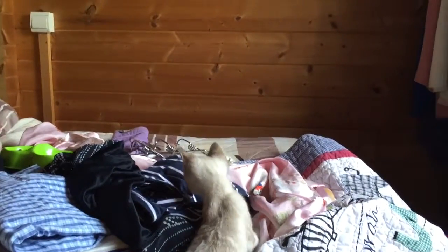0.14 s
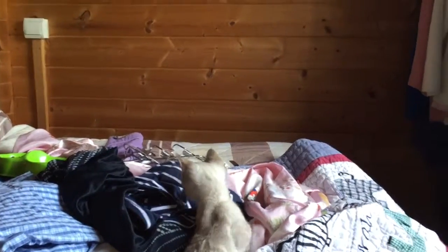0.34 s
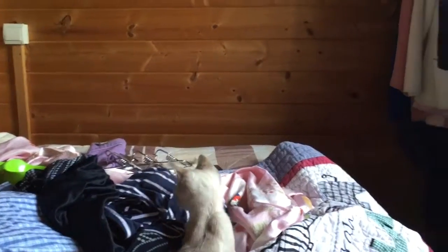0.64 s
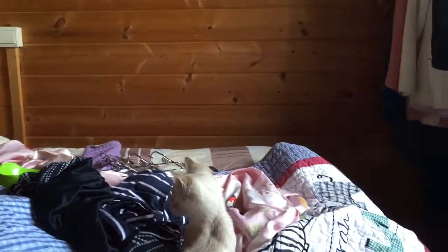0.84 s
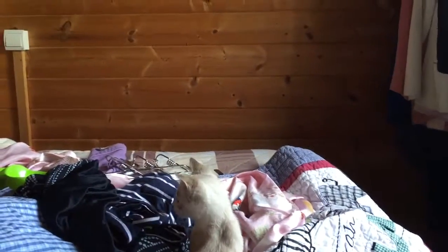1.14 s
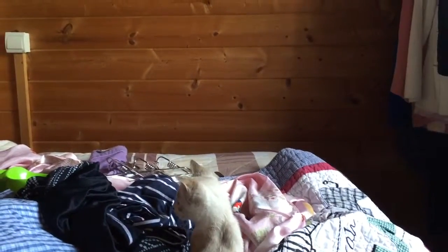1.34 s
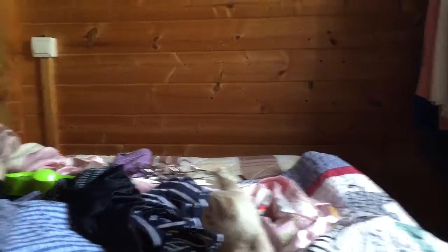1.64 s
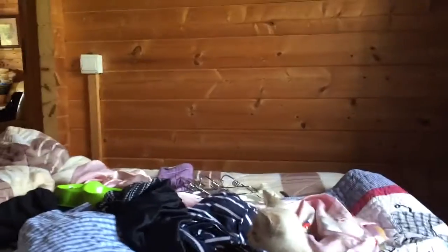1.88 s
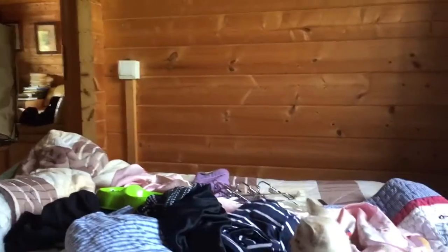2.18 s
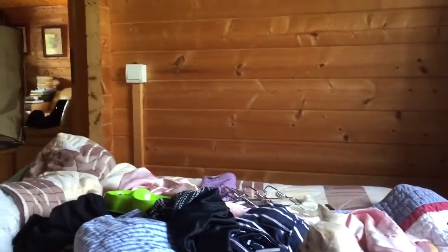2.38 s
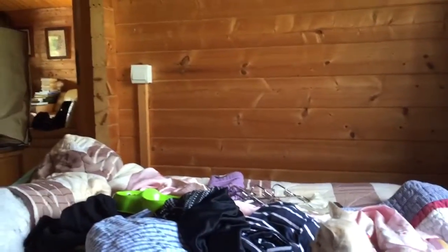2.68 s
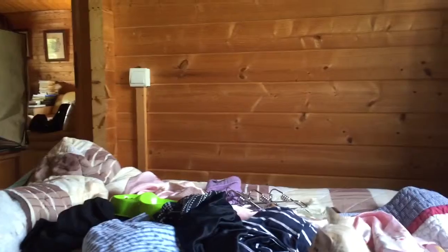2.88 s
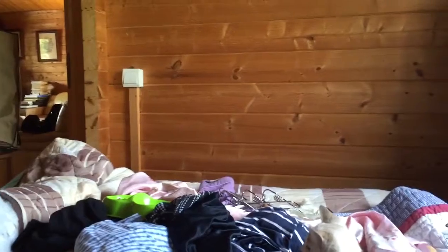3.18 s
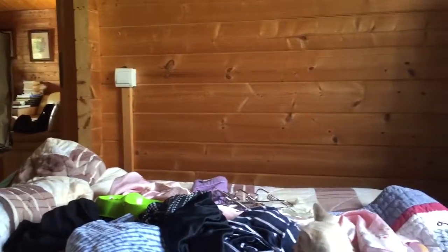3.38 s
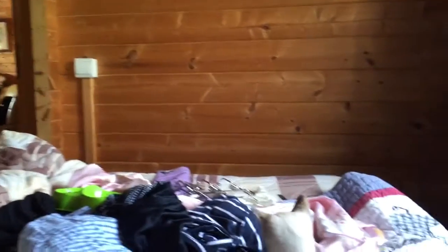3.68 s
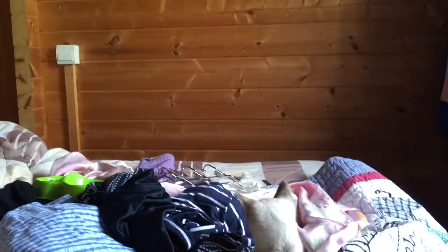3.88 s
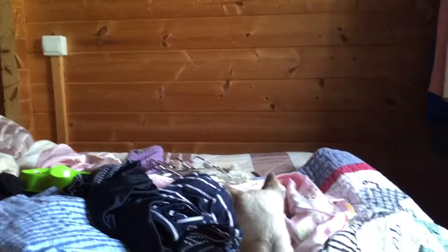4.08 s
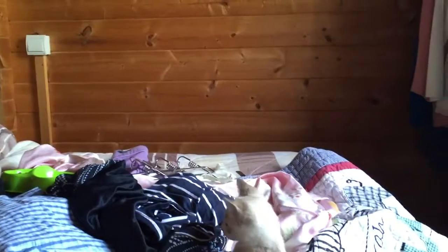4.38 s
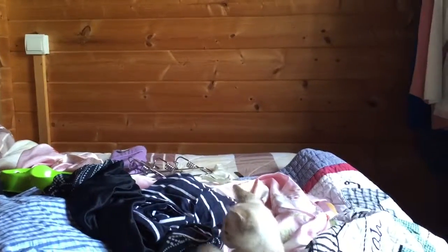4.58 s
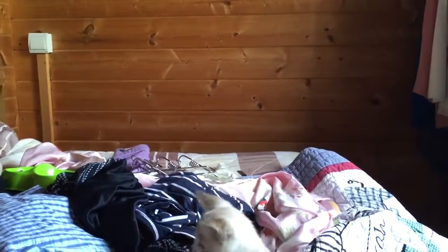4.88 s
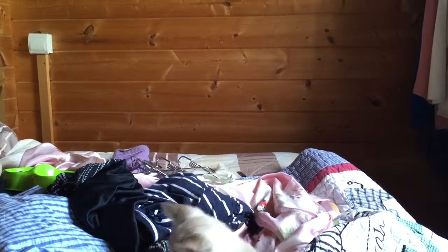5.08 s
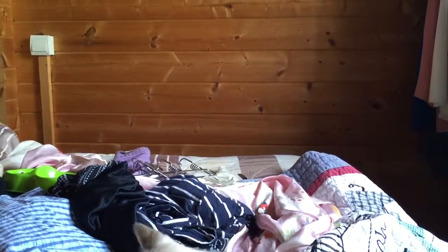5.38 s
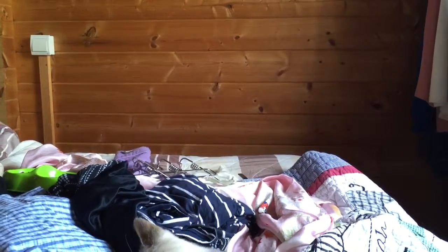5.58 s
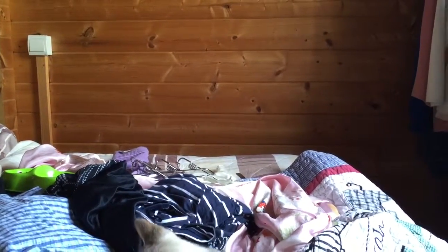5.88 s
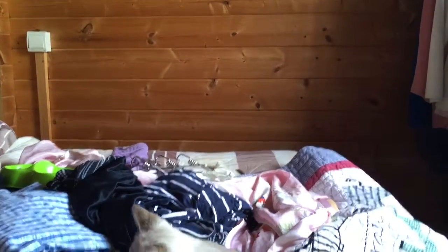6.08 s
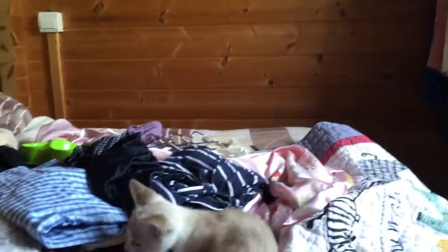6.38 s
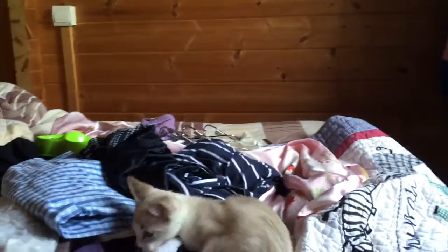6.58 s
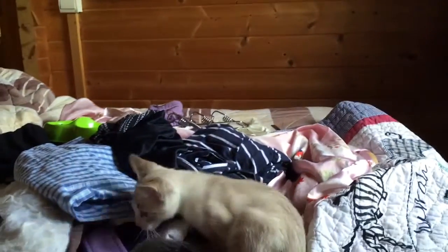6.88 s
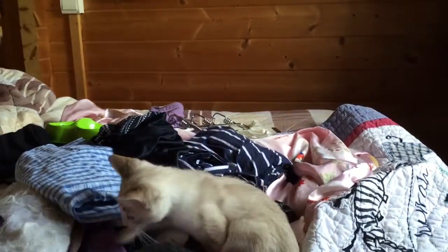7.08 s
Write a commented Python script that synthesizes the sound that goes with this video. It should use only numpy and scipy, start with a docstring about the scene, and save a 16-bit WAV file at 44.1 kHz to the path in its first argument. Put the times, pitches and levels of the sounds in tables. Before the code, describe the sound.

Thin high nose whistles and falling yelps from a restless dog, puffs of air, soft paw thuds, then two loud hoarse barks in a small room.

```python
"""In a small wooden room a dog whistles thinly through its nose, sniffs, chuffs, yelps, barks twice and thumps its paws.
Air jets give the whistles (gliding tones with an octave and hiss), and shaped noise the sniffs and chuffs. The voice is
a sum of partials: yelps fall and settle into whines, barks break from a squeal to a rough, lower pitch. Paws ring the
boards as damped low tones and noise. Close walls answer, a faint longer echo lingers, and steady low-level noise remains."""
import sys
import numpy as np
from scipy import signal
from scipy.fft import rfft, irfft, next_fast_len
from scipy.io import wavfile
from scipy.ndimage import uniform_filter1d, minimum_filter1d, map_coordinates

SR = 44100
rng = np.random.default_rng(int(sys.argv[2]) if len(sys.argv) > 2 else 0)


def store_pcm(level_fs):
    """Save levels as 16-bit WAV."""
    pcm = np.round(np.clip(level_fs, -1, 1) * 32767).astype(np.int16)
    wavfile.write(sys.argv[1], SR, np.atleast_2d(pcm).T)


N = 319119
TOP_HZ = 15500  # upper limit of the whole sound

# Spectrum of the quiet room: hz, relative_db
STILL_COLOUR = [(15, -55), (25, -24.5), (55, 6.5), (101, -1.5), (193, -7), (482, -12), (782, -16),
                (1300, -17), (4750, -19.5), (6380, -23.5), (9550, -26), (13200, -31), (15500, -29)]
STILL_DB = -70  # rms
# Decay of the wooden walls' answer: hz, t60_s
WALL_DECAY = [(110, .25), (200, 0.19), (400, 0.39), (700, 0.2), (2000, 0.21), (5000, 0.17), (12000, 0.18)]
# Spectrum of the late echo: hz, relative_db
LINGER_COLOUR = [(300, -30), (700, -15), (1000, 0), (1300, -3), (1600, -2.5), (2000, 4), (2400, 4),
                 (2800, -9.5), (4000, -4.5), (7000, -20)]

# Nose whistles: start_s, length_s, start_hz, turn_hz, end_hz, turn_share_of_length, mid_level_db,
# swell_start_to_end_db, octave_re_tone_db, air_re_tone_db (before the common air trim)
WHISTLES = [ (0.641, .165, 6110, 5970, 5905, .17, -49, 5, -11, -21),
            (0.850, 0.24, 5830, 5833, 5770, .55, -49.5, 0, -15, -22.5),
            (1.496, 0.23, 5900, 5830, 5520, 0.5, -44, -9.5, -21.5, -17),
            (1.723, 0.2, 5664, 5635, 5480, 0.45, -47.5, 6.5, -7, -15),
            (1.908, 0.11, 5610, 5484, 5420, .4, -42, -1.5, -14, -22.5),
            (2.222, 0.21, 5950, 5480, 5595, .36, -45, -17, -3, -9),
            (2.440, .158, 5634, 5560, 5500, .5, -82.5, -8, -9, 1),
            (2.602, 0.099, 5400, 5590, 5580, 0.53, -67.5, 6, -5, -9),
            (2.695, 0.073, 5460, 5476, 5120, 0.67, -58, -8, -9, -3),
            (3.020, 0.091, 5540, 5960, 5730, .45, -55, -10, -5.5, 1.5),
            (3.188, 0.085, 5840, 5574, 5370, .55, -58.5, 4, -12, -3),
            (3.478, 0.071, 5950, 6000, 5830, 0.63, -59, 11, -22, -4.5),
            (3.632, .240, 5640, 5657, 5920, 0.67, -56, -6.5, -10.5, -8),
            (4.195, 0.068, 6030, 5760, 5800, .55, -53.5, 9, -10.5, -2.5),
            (4.269, .110, 5690, 5605, 5665, .55, -70.5, -6, -17, -10.5),
            (4.385, 0.26, 5710, 5726, 5640, 0.54, -66.5, 16, -12, -2),
            (5.165, 0.044, 5600, 5510, 5400, .4, -64.5, -6, -29, -39),
            (5.321, 0.19, 5310, 5495, 5290, .75, -56, 15.5, -2.5, -11.5),
            (6.277, .154, 5580, 5860, 5556, 0.373, -48.5, -8, -11, -12),
            (6.43, 0.13, 5370, 5417, 5620, 0.56, -45, 13.5, -13.5, -23),
            (6.568, 0.11, 5400, 5415, 5543, .5, -47, -6.5, -15.5, -8.5),
            (6.863, .142, 5870, 5460, 5463, 0.31, -48, -10, -0.5, -11.5),
            (7.005, 0.13, 5950, 5930, 5400, 0.36, -52, -5.5, -22, -9.5)]
# Resonances of the nose that colour the whistle's hiss: hz, relative_db
NOSE_AIR_COLOUR = [(700, -17), (1450, -0.5), (1900, -12.5), (2500, 0), (3200, -11), (4100, 1.5),
                   (5000, -2.5), (7000, -7), (9000, -7), (10300, -12.5), (12000, -32.5), (15000, -19.5)]
WHISTLE_ATTACK_S, WHISTLE_RELEASE_S = 0.016, 0.025
WHISTLE_FLICKER_DB, WHISTLE_FLICKER_RATE = 0.94, 26  # unsteady jet: depth, random knots a second

# Thin puffs through the nostrils: centre_s, peak_level_db
SNIFFS = [(1.116, -73.5), (2.039, -64.5), (3.95, -66.5), (4.038, -73), (5.302, -62.5), (5.635, -58),
          (6.001, -68), (7.026, -58)]
# Spectrum of a sniff: hz, relative_db
SNIFF_COLOUR = [(1000, -10.5), (3000, -9.0), (7800, -23.5), (9000, -2), (10000, -21.5), (15000, -33.5)]

# Chuffs of air: time_s, level_db, hiss_db (relative), rise_constant_s, decay_constant_s
CHUFFS = [(1.295, -39.5, -32, 0.0083, 0.032), (1.465, -51, 4.5, 0.022, 0.042),
          (2.057, -54.5, 3.5, .03, 0.052), (2.175, -42, 1, 0.05, 0.058), (2.817, -62, 5, 0.034, 0.14),
          (2.919, -43, -6.5, 0.0047, 0.068), (3.15, -28, -23.5, 0.0035, 0.036),
          (3.269, -17.5, -16, 0.015, 0.034), (3.442, -27, -19, 0.01, 0.041),
          (5.521, -18, -18, 0.00924, .029), (6.242, -30.5, -16, 0.007, 0.033),
          (6.586, -23, -21, 0.0051, 0.033), (6.83, -44, 1, 0.029, 0.044), (6.938, -24.5, -23, 0.011, 0.033)]
# Spectrum of a chuff's body: hz, relative_db
CHUFF_COLOUR = [(71, -43), (120, -13), (215, -13.5), (373, -12.5), (835, -11), (1520, -4), (1810, -2.5),
                (2050, 0), (2360, -6.5), (4240, -16.5), (4960, -24.5), (5200, -26.5), (6760, -45),
                (11400, -120)]
# Spectrum of a chuff's hiss: hz, relative_db
HISS_COLOUR = [(2060, -29), (3500, -1), (3960, -13.5), (4550, -5.5), (4990, -22), (5510, -7), (6770, -17),
               (9240, -13.5), (15500, -24.5)]

# Paws on the boards: start_s, level_db, board_hz, scuff_db (relative)
PAWS = [(1.32, -53, 138, -12), (1.781, -39, 113, -13), (1.819, -40, 126, -28), (1.843, -55, 75.5, -33),
        (2.933, -33.5, 154, -15), (2.949, -39, 75.5, -38), (3.027, -37, 178, -13), (3.13, -34, 76.7, -9),
        (3.168, -30.5, 158, -20), (3.302, -42.5, 131, -22), (3.458, -33, 196.3, -24),
        (3.589, -48.5, 74, -17.5), (3.968, -40.5, 247, -10), (3.991, -44, 142.3, -11.5),
        (5.549, -33.5, 190, -24), (6.27, -42.5, 192.3, -7.5), (6.609, -37, 186, -20), (6.719, -42, 75, -20),
        (6.798, -66, 85.5, -27), (7.083, -53, 90.7, -2)]
# Spectrum of the boards' dull noise: hz, relative_db
BOARD_COLOUR = [(20, -28.5), (45, -10.5), (72, 3.5), (100, 0.5), (135, -1), (200, 4.5), (300, -14.5),
                (500, -10.5), (1000, -31), (3000, -39.5)]
# Spectrum of a pad's scuff: hz, relative_db
SCUFF_COLOUR = [(100, -14.5), (450, -2.0), (900, -2.5), (3000, -9.5), (8000, -36)]

# First yelp, falling into a whine: time_s, pitch_hz, level_db, octave_level_db
YELP_A = [(2.2, 1443, -59.5, -72), (2.224, 1429, -28, -41), (2.24, 1375, -33, -75),
          (2.27, 1285, -35.5, -62), (2.284, 1245, -39.5, -93), (2.308, 1121, -50, -77.5),
          (2.33, 960, -35.5, -53.5), (2.404, 856.5, -26.5, -66), (2.45, 694, -37, -44),
          (2.554, 650.6, -48, -37), (2.602, 678, -34.5, -41), (2.652, 641.4, -54.5, -38),
          (2.706, 671.7, -37.5, -41.5), (2.77, 652, -82, -66.5)]
# Second yelp: time_s, pitch_hz, level_db, octave_level_db
YELP_B = [(3.005, 1220, -48.5, -63.5), (3.019, 1130, -21.5, -27), (3.051, 1088, -28, -42),
          (3.065, 1040, -29.5, -38), (3.089, 785, -43, -50.5), (3.147, 684.4, -32, -49.5),
          (3.185, 630, -57, -25)]
# Third yelp: time_s, pitch_hz, level_db, octave_level_db
YELP_C = [(4.07, 946, -55, -74), (4.09, 1022, -49, -61), (4.118, 942, -37.5, -48), (4.166, 670, -39.5, -46),
          (4.21, 643, -79, -62), (4.288, 586, -50.5, -72), (4.356, 637.5, -53, -45.5),
          (4.422, 675.7, -37.5, -58.5), (4.444, 645, -52.5, -77), (4.476, 650, -41, -48.5),
          (4.57, 668, -47.5, -67), (4.63, 649, -76.5, -80)]
# Last whine: time_s, pitch_hz, level_db, octave_level_db
YELP_D = [(5.18, 673.2, -62, -63), (5.206, 673.5, -34.5, -52.5), (5.228, 675.0, -35, -54),
          (5.25, 649.0, -45, -45), (5.268, 667.8, -63, -51), (5.286, 629.4, -47.5, -58.5),
          (5.328, 679.9, -37.5, -50), (5.355, 682.8, -59.5, -61)]
# Manner of each yelp: curve, high_pitch_roughness_0_to_1, overtones_db, overtone_tilt_db_per_octave, sidebands_db
# (overtones and sidebands at the reference strengths of voice and whistle)
YELPS = [(YELP_A, 0.19, -53, -1.4, -56), (YELP_B, 0.43, -56, 0, -66), (YELP_C, .8, -56.5, -1, -56),
         (YELP_D, 0.13, -48.5, -34.5, -57.5)]
# Resonances of the muzzle in the yelps' overtones: hz, relative_db
MUZZLE = [(1900, 4), (2600, 7), (3200, -2), (4200, -10), (5100, -43), (7000, -8), (9500, -26.5),
          (15000, -38.5)]
# Spectrum of the sidebands that the voice puts on the whistle: hz, relative_db
SIDEBAND_COLOUR = [(2500, -41), (3100, 4), (3750, 12), (4400, 12.5), (5000, -7), (6500, -1), (7700, -36.5),
                   (9300, 4), (10500, -22.5), (12200, -7), (15000, -24)]
# Low catch in the throat: time_s, pitch_hz, level_db
GRUNT = [(4.17, 410, -79), (4.2, 337, -57.5), (4.22, 370, -46), (4.26, 334, -101)]
YELP_REFERENCE_DB, WHISTLE_REFERENCE_DB = -35.5, -70
# growth of the sidebands, dB for each dB of voice and of whistle
SIDEBANDS_PER_VOICE, SIDEBANDS_PER_WHISTLE = 0.5, 0.4

# Barks: start_s, length_s, attack_s, peak_after_s, peak_db, swell_db_per_s, fade_db_per_s, squeal_re_level_db,
# jaw_opens_after_s, squeal_hz, hoarse_hz, sag_hz_per_s, pitch_breaks_after_s, break_width_s,
# open_jaw_roughness_0_to_1, jitter_share_at_full_roughness, half_pitch_lines_db (before roughness)
BARKS = [(4.937, 0.15, 0.0044, 0.071, -7, 20.5, 261, -15, 0.013, 1036, 765.8, 1100, .044, .009, .45, 0.067, -2),
         (5.705, .140, 0.0044, 0.058, -8.5, 11, 215, -14, .021, 1124, 817.6, 444.2, .022, 0.0028, 0.38, 0.036, 0.5)]
# Spectrum of the first bark, its harmonics included: hz, relative_db
BARK_A_COLOUR = [(100, -50), (400, -32), (560, -16), (740, -6), (1000, -4.5), (1200, -8.5), (1470, 2),
                 (1750, -4.5), (2200, -4), (2600, -15.5), (3000, -12), (3350, -22.5), (3750, -14),
                 (4200, -33.5), (9000, -29), (15000, -53)]
# Spectrum of the second bark, its harmonics included: hz, relative_db
BARK_B_COLOUR = [(100, -43.5), (550, -30), (800, -11.5), (1100, 0.5), (1350, -20.5), (1600, 0.5),
                 (2000, -9.5), (2400, -3.5), (2800, -14), (3130, -9.5), (3550, -11.5), (3950, -14),
                 (4300, -29), (4750, -23.5), (5500, -31.5), (9000, -28.5), (15000, -50.5)]
BARK_RELEASE_S, JAW_WIDTH_S = 0.061, 0.003
JAW_SHUT_DB, JAW_OPEN_DB, BROKEN_DB = -14.5, -7, 6.5  # overtones: shut, open, added once the pitch has broken
SQUEAL_ROUGH, BREAK_ROUGH = 0.14, 0.3  # roughness of the squeal; extra in the middle of the break
FLUTTER_RATE, RATTLE_RATE = 260, 140  # random knots a second
BARK_PATCHY_DB, RATTLE_DEPTH = 1.5, 0.35
# Spectrum of the push under a bark: hz, relative_db
PUSH_COLOUR = [(15, -5.5), (35, -0.5), (90, -7), (170, -3.5), (320, -11.5), (600, -27), (2000, -70)]


def amp(db):
    """Decibels to amplitude ratio."""
    return 10 ** (np.asarray(db) / 20)


def unit(x):
    """Normalization to rms 1."""
    return x / np.sqrt(np.mean(x ** 2) + 1e-20)


def along(points, hz):
    """Interpolation of (hz, value) points on a logarithmic frequency axis."""
    f, v = np.transpose(points)
    return np.interp(np.log(hz + 1), np.log(f + 1), v)


def curves(rows):
    """Linear interpolation in time: the start time, then one value per sample for each column."""
    s, *cols = np.transpose(rows)
    t = np.arange(s[0], s[-1], 1 / SR)
    return [s[0]] + [np.interp(t, s, c) for c in cols]


def wobble(n, rate):
    """Band-limited random modulation: a smooth curve through rate random knots a second."""
    knots = rng.standard_normal(int(n * rate / SR) + 4)
    return map_coordinates(knots, [np.arange(n) * rate / SR])


def noise(n, colour):
    """Spectral shaping: random noise of about rms 1 filtered to a (hz, db) spectrum."""
    m = next_fast_len(n + 8192)
    spectrum = rfft(rng.standard_normal(m))
    shape = amp(along(colour, np.fft.rfftfreq(m, 1 / SR)))
    return unit(irfft(spectrum * shape, m))[:n]


def cycles(hz):
    """Phase as the running integral of frequency, in radians."""
    return 2 * np.pi * np.cumsum(hz) / SR


def gate(t, length, attack, release):
    """Amplitude envelope: smooth rise, hold and smooth fall."""
    rise = np.sin(np.pi / 2 * np.clip(t / attack, 0, 1))
    fall = np.sin(np.pi / 2 * np.clip((length - t) / release, 0, 1))
    return (rise * fall) ** 2


def add(track, s, x):
    """Superposition of a sound on a track at time s, its ends softened over 100 samples."""
    i = np.arange(len(x))
    x = x * np.minimum(1, np.minimum(i, i[::-1]) / 100)
    part = track[max(0, round(s * SR)):][:len(x)]
    part += x[:len(part)]


def partials(colour, hz, phase, patchy_db=3.0):
    """Additive synthesis: gliding partials that swell and fade independently, with about one unit sine's power."""
    weights = amp(along(colour, np.abs(hz))) * (hz < TOP_HZ)
    swells = amp(patchy_db * np.array([wobble(hz.shape[1], 35) for _ in hz]))
    return (weights * unit(swells) * np.sin(phase)).sum(0) / np.linalg.norm(weights, axis=0)


def room(x, wet_db):
    """Reverberation: direct sound plus dense wall reflections decaying by frequency, at constant power."""
    hz, t, z = signal.stft(rng.standard_normal(SR // 2), SR, nperseg=256)
    decay = amp(-60 * t / along(WALL_DECAY, hz)[:, None])
    tail = signal.istft(z * decay, SR, nperseg=256)[1]
    tail = np.pad(tail / np.linalg.norm(tail), (130, 0))  # about 3 ms before the first reflection
    return (x + amp(wet_db) * signal.fftconvolve(x, tail)[:N]) / np.hypot(1, amp(wet_db))


def late_echo(x, late_db, t60):
    """Late reverberation: the house holds a faint, longer, exponentially decaying echo in the middle range."""
    tail = noise(SR, LINGER_COLOUR) * amp(-60 * np.arange(SR) / SR / t60)
    return amp(late_db) * signal.fftconvolve(x, tail / np.linalg.norm(tail))[:N]


def whistle_phase(jitter=0.0048, glide_jitter=0.012):
    """Frequency modulation of the nose tone: notes slide to a turn and an end, less steady while sliding fast."""
    knots = []
    for s, length, start_hz, turn_hz, end_hz, turn, *_ in WHISTLES:
        knots += [(s, start_hz), (s + turn * length, turn_hz), (s + length, end_hz)]
    pitch = np.interp(np.arange(N) / SR, *np.transpose(sorted(knots)))
    slope_hz_per_s = np.abs(np.gradient(pitch)) * SR
    sliding = np.clip(slope_hz_per_s / 9000, 0, 1) ** 2
    deviation = jitter * wobble(N, 130) + glide_jitter * sliding * wobble(N, 700)
    return cycles(pitch * (1 + deviation)), pitch


def whistles(nose_phase, air_trim_db=-3):
    """Jet tone: air through the narrowed nose sings a note and its octave, and hisses; gives sound and strength."""
    out, strength = np.zeros(N), np.zeros(N)
    for s, length, _, _, _, _, db, swell_db, octave_db, air_db in WHISTLES:
        t = np.arange(round(length * SR)) / SR
        phase = nose_phase[round(s * SR):][:len(t)]
        flow = amp(db + swell_db * (t / length - .5))
        flow = flow * gate(t, length, WHISTLE_ATTACK_S, WHISTLE_RELEASE_S)
        first, second = [amp(WHISTLE_FLICKER_DB * wobble(len(t), WHISTLE_FLICKER_RATE)) for _ in range(2)]
        tone = np.sqrt(2) * (first * np.sin(phase) + amp(octave_db) * second * np.sin(2 * phase))
        hiss = amp(air_db + air_trim_db) * noise(len(t), NOSE_AIR_COLOUR)
        add(out, s, flow * (tone + hiss))
        add(strength, s, flow)
    return out, strength


def sniffs(width_s=0.052):
    """Turbulence noise in the nostrils: short bell-shaped swells of air, strongest near 9 kHz."""
    out, t = np.zeros(N), np.arange(SR // 5) / SR - .1
    for s, db in SNIFFS:
        add(out, s + t[0], amp(db) * np.exp(-(t / width_s) ** 2) * noise(len(t), SNIFF_COLOUR))
    return out


def chuffs(body_db=-6, hiss_trim_db=-6):
    """Turbulent pulse: a short blast of air starts abruptly and is quickly spent."""
    out, t = np.zeros(N), np.arange(SR // 4) / SR
    for s, db, hiss_db, rise, decay in CHUFFS:
        blast = (1 - np.exp(-t / rise)) * np.exp(-(t / decay) ** 1.6)
        body = amp(body_db) * noise(len(t), CHUFF_COLOUR)
        hiss = amp(hiss_db + hiss_trim_db) * noise(len(t), HISS_COLOUR)
        add(out, s - .003, amp(db) * blast * (body + hiss))
    return out


def paws(rise_s=0.0047, t60=0.18, thud_db=-6, dull_db=-8, scuff_trim_db=-4):
    """Impact and damped resonance: each pad sets its floorboard ringing low and scuffs over it."""
    out, t = np.zeros(N), np.arange(SR // 3) / SR
    for s, db, hz, scuff_db in PAWS:
        thud = amp(thud_db) * np.sin(cycles(hz * (1 + 0.092 * wobble(len(t), 60))))
        board = thud + amp(dull_db) * noise(len(t), BOARD_COLOUR)
        ringing = amp(-60 * t / t60) * (1 - np.exp(-t / rise_s)) * board
        scuff = amp(scuff_db + scuff_trim_db) * np.exp(-t / 0.026) * noise(len(t), SCUFF_COLOUR)
        add(out, s, amp(db) * (ringing + scuff))
    return out


def yelps(nose_phase, nose_hz, whistling, jitter=0.0058, strain=0.04, breath_db=-14,
          attack=0.0048, release=0.01685):
    """Harmonic voice with intermodulation: shakier while high, overtones rising and falling in step with the voice."""
    out = np.zeros(N)
    for rows, roughness, upper_db, tilt_db, side_db in YELPS:
        s, hz, db, second_db = curves(rows)
        n = len(hz)
        now = slice(round(s * SR), round(s * SR) + n)
        effort = np.hypot(amp(db), amp(second_db)) / amp(YELP_REFERENCE_DB)
        rough = roughness * np.clip((hz - 670) / 120, 0, 1)
        phase = cycles(hz * (1 + (jitter + strain * rough) * wobble(n, 300)))

        k = np.arange(3, 17)[:, None]  # overtone numbers
        muzzle = [(f, level + tilt_db * np.log2(f / MUZZLE[0][0])) for f, level in MUZZLE]
        breath = amp(breath_db) * noise(n, [(300, -23.5)] + muzzle)
        upper = partials(muzzle, k * hz, k * phase) + breath

        # the vocal folds chop the air that feeds the whistle: lines at whistle pitch +- multiples of voice pitch
        m = np.r_[-4:0, 1:11][:, None]
        sidebands = partials(SIDEBAND_COLOUR, nose_hz[now] + m * hz, nose_phase[now] + m * phase)
        sidebands = sidebands * (whistling[now] / amp(WHISTLE_REFERENCE_DB)) ** SIDEBANDS_PER_WHISTLE

        voice = amp(db) * np.sin(phase) + amp(second_db) * np.sin(2 * phase)
        voice += amp(upper_db) * effort * upper
        voice += amp(side_db) * effort ** SIDEBANDS_PER_VOICE * sidebands
        shimmer = (1 + rough * wobble(n, 350)) / np.hypot(1, rough)
        envelope = gate(np.arange(n) / SR, n / SR, attack, release)
        add(out, s, np.sqrt(2) * envelope * shimmer * voice)
    return out


def grunt():
    """Pure tone of gliding frequency: a low catch in the throat."""
    out = np.zeros(N)
    s, hz, db = curves(GRUNT)
    add(out, s, np.sqrt(2) * amp(db) * np.sin(cycles(hz)))
    return out


def bark(row, colour, air_db):
    """Period doubling and chaos: a squeal turns hoarse as the jaw opens and its pitch breaks down, with pulsed air."""
    (s, length, attack, peak_s, peak_db, swell, fade, squeal_db, jaw_s,
     squeal_hz, hoarse_hz, sag, break_s, break_width, hoarse, jitter, half_db) = row
    n = round(length * SR)
    t = np.arange(n) / SR
    jaw = .5 + .5 * np.tanh((t - jaw_s) / (2 * JAW_WIDTH_S))  # 0 shut, 1 open
    broken = .5 + .5 * np.tanh((t - break_s) / (2 * break_width))  # 0 at squeal pitch, 1 at hoarse pitch
    hz = squeal_hz + broken * (hoarse_hz - sag * (t - break_s) - squeal_hz)
    db = peak_db + np.minimum(swell * (t - peak_s), fade * (peak_s - t)) + squeal_db * (1 - jaw)
    overtones_db = JAW_SHUT_DB + jaw * (JAW_OPEN_DB - JAW_SHUT_DB) + broken * BROKEN_DB
    rough = SQUEAL_ROUGH + jaw * (hoarse - SQUEAL_ROUGH) + BREAK_ROUGH * np.sin(np.pi * broken)
    rough = np.clip(rough, 0, 1)
    phase = cycles(hz * (1 + jitter * rough * wobble(n, 500)))

    k = np.arange(2, 37)[:, None] / 2  # whole harmonics and the half-pitch lines between them
    patches = BARK_PATCHY_DB * np.array([wobble(n, 60) for _ in k])
    weights = amp(along(colour, k * hz) + overtones_db * (k > 1) + patches) * (k * hz < TOP_HZ)
    weights = weights * np.where(k % 1 > 0, rough * amp(half_db), 1)
    # chaotic folds make every partial flutter on its own
    flutter = (1 + rough * np.array([wobble(n, FLUTTER_RATE) for _ in k])) / np.hypot(1, rough)
    lines = weights * flutter * np.sin(k * phase + k * k)  # k * k spreads the starting phases
    tone = np.sqrt(2) * lines.sum(0) / np.linalg.norm(weights, axis=0)

    air = amp(air_db) * unit(noise(n, colour) * (1 + 0.06 * np.cos(phase)))
    rattle = 1 + RATTLE_DEPTH * rough * wobble(n, RATTLE_RATE)
    voice = np.sqrt(1 - rough ** 2) * tone + rough * air
    out = np.zeros(N)
    add(out, s, amp(db) * gate(t, length, attack, BARK_RELEASE_S) * rattle * voice)
    return out


def thump(barks, thump_db=-40, knee=0.24):
    """Threshold-like response: a dull, low push follows the very loudest part of each bark."""
    loud = np.sqrt(np.abs(uniform_filter1d(barks ** 2, size=400)))
    push = np.tanh((loud / knee) ** 3)
    return amp(thump_db) * push * noise(N, PUSH_COLOUR)


def scene():
    """Superposition of the dog's nose, paws and voice in the quiet room."""
    barks = bark(BARKS[0], BARK_A_COLOUR, air_db=-3.5) + bark(BARKS[1], BARK_B_COLOUR, air_db=0.5)
    nose_phase, nose_hz = whistle_phase()
    nose, whistling = whistles(nose_phase)
    voice = yelps(nose_phase, nose_hz, whistling) + grunt()
    dog = room(barks, wet_db=-2) + room(voice, wet_db=-6.5) + room(nose + sniffs(), wet_db=-1.5)
    dog += room(chuffs(), wet_db=-10) + room(paws(), wet_db=-11)
    still = amp(STILL_DB) * noise(N, STILL_COLOUR)
    return (dog + thump(barks) + late_echo(dog, late_db=-35.5, t60=0.6) + still)[None]


def record(dry, ceiling=0.84, hold_s=0.0023):
    """Peak limiting and band limiting: a fast gain turns down peaks over the ceiling; nothing stays above TOP_HZ."""
    passband = np.fft.rfftfreq(N, 1 / SR) < TOP_HZ
    x = irfft(rfft(dry) * passband, N)
    size = round(hold_s * SR)
    needed = np.minimum(1, ceiling / (np.abs(x) + 1e-9))
    x = x * uniform_filter1d(minimum_filter1d(needed, size), size)
    return irfft(rfft(x) * passband, N)


dry = scene()
out = record(dry)
store_pcm(out)
```